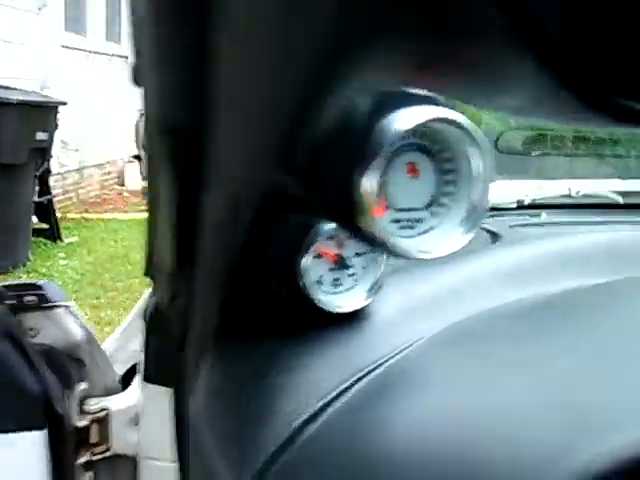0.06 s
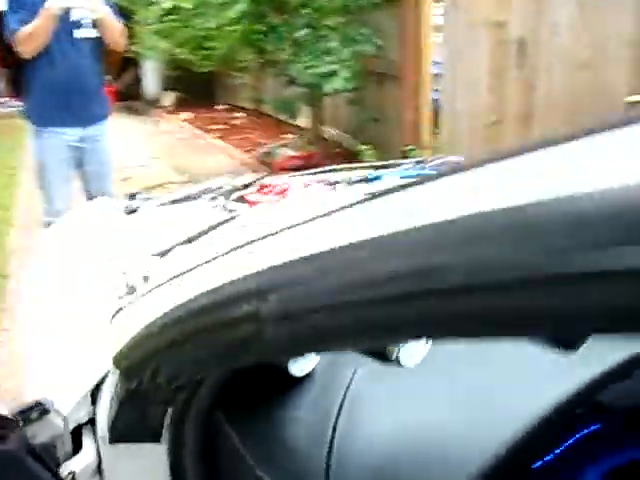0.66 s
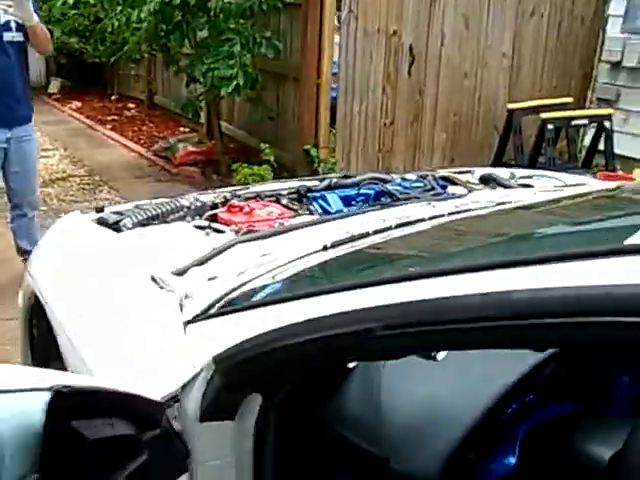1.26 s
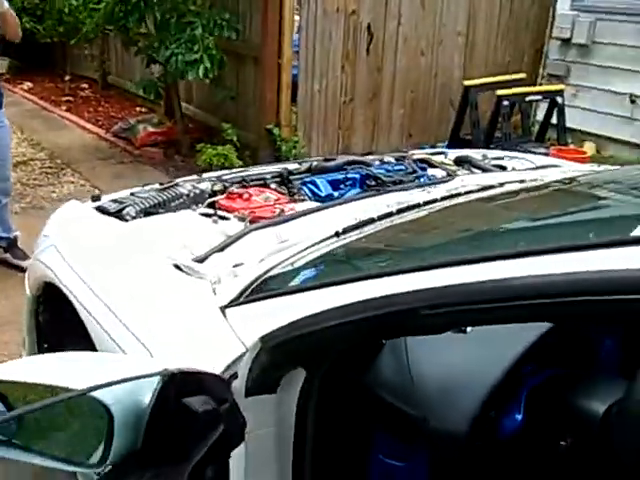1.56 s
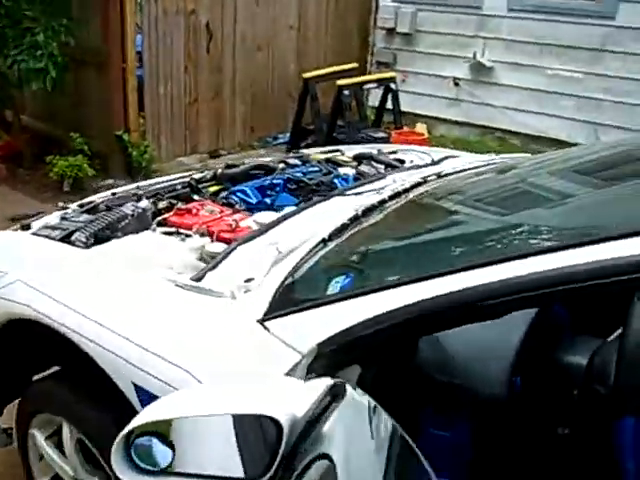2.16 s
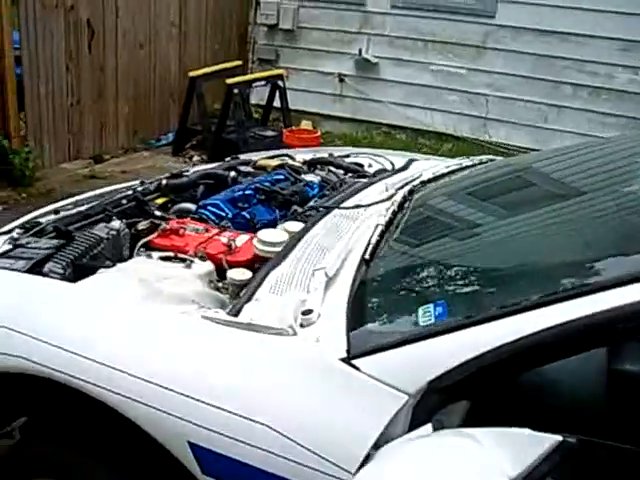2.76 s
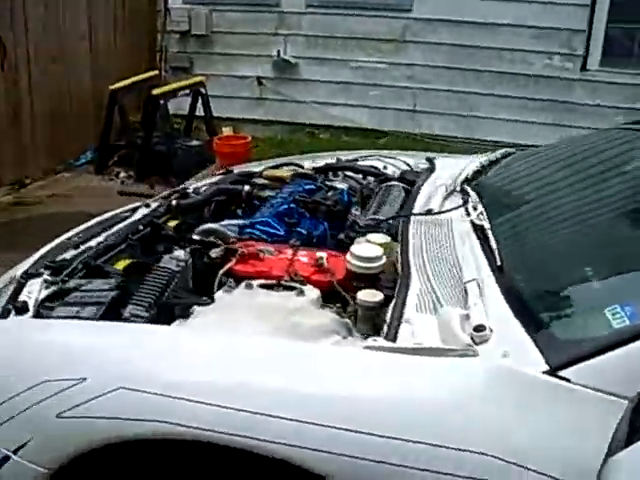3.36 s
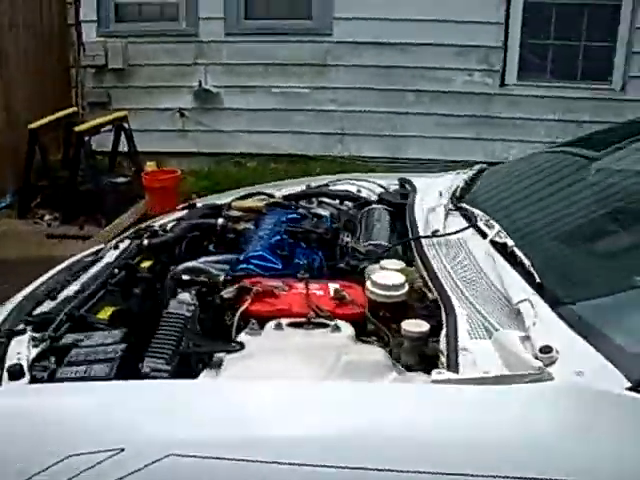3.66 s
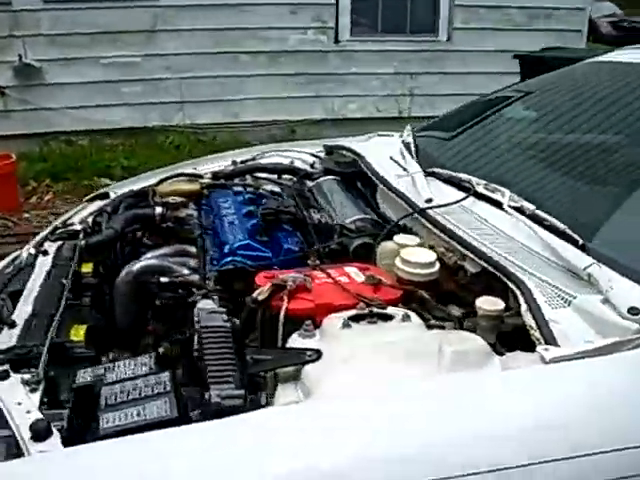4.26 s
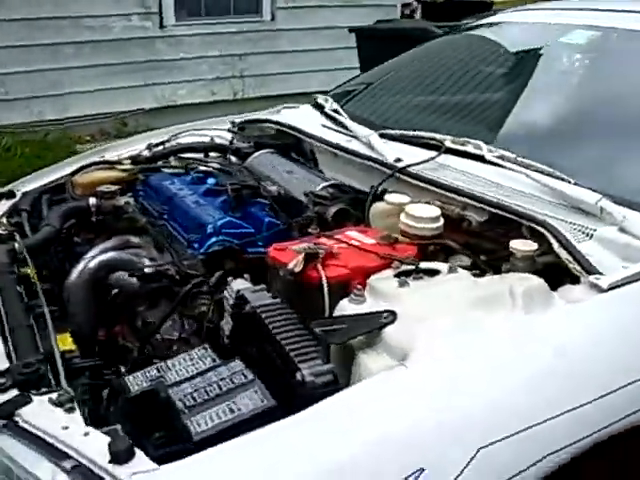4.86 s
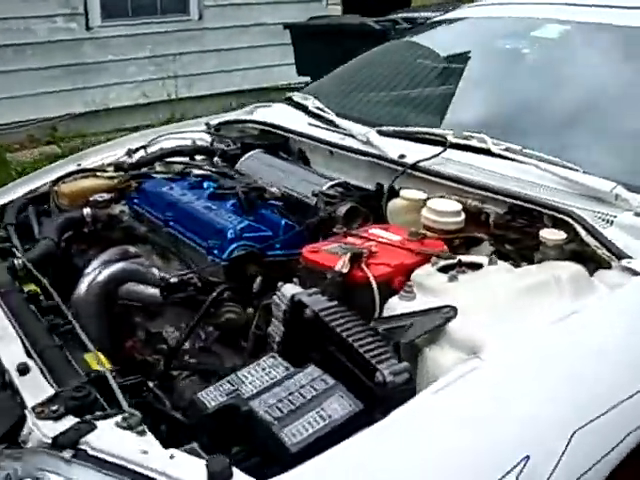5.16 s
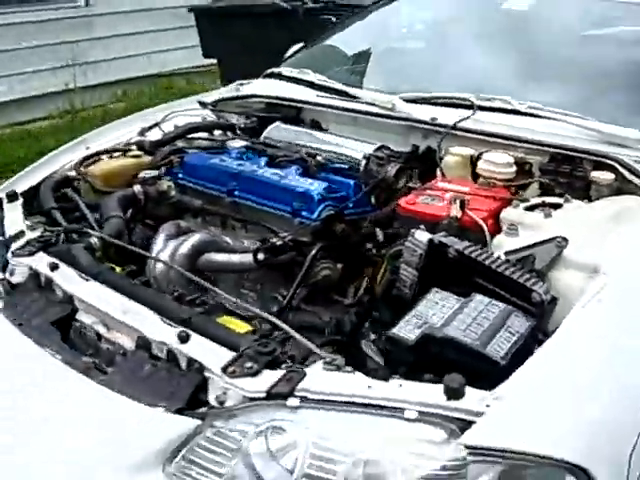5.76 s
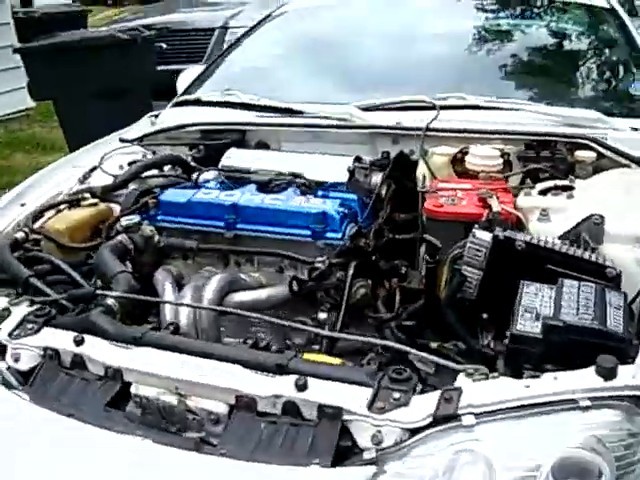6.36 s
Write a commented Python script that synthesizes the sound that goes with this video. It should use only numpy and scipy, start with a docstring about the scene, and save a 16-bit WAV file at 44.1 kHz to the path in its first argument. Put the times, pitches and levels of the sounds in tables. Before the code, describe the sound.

Outdoors, a car engine idles steadily, its exhaust pulsing in a low drone with a slight lope. A loose valve ticks evenly about seven times a second. Short puffs of wind hit the microphone early in the walk toward the open engine bay. There the rush of belts, bright hiss and fine valve clatter become closer and clearer, while a cooling fan hums softly underneath.

```python
"""The low drone of a four-cylinder car idling in a yard, heard on a walk from the driver's door to the
open engine bay. The exhaust pulses at the rear with every firing, and one weak cylinder makes it lope.
Block, belts and hiss grow louder on the approach, beside the hum of the cooling fan. One loose tappet
ticks once per camshaft turn over the clatter of the other valves. A few gusts buffet the microphone."""
import sys
import numpy as np
from scipy import signal
from scipy.fft import rfft, irfft, next_fast_len
from scipy.io import wavfile
from scipy.ndimage import uniform_filter1d, minimum_filter1d

SR = 44100
rng = np.random.default_rng(int(sys.argv[2]) if len(sys.argv) > 2 else 0)


def persist_wave(psi):
    """Save psi, clipped to +-1, as 16-bit WAV."""
    counts = np.round(np.clip(psi, -1, 1) * 32767).astype(np.int16)
    wavfile.write(sys.argv[1], SR, np.atleast_2d(counts).T)


N = 282681
TIME = np.arange(N) / SR

# The engine bay along the walk. Each row: time in seconds, rumble fader in dB, hiss fader in dB.
BAY_FADERS = [(0.0, -45.5, -60.0), (0.9, -43, -51.5), (1.8, -42, -50), (2.15, -40, -48.5),
              (2.6, -43.2, -52.5), (3.1, -38, -44), (3.8, -37.5, -44), (4.15, -35, -38.5), (4.45, -40, -41),
              (4.8, -37.5, -39), (6.41, -37, -36)]
# The ring of the valve cover. Each row: pitch in Hz, relative level in dB, seconds to fall 60 dB.
COVER_MODES = [(2270, -22, .015), (2760, -8, 0.018), (3024, -0.5, 0.028), (3203, -6.5, 0.056),
               (3490, 0.5, 0.02), (3760, -4.5, 0.03), (3900, -8, 0.032), (4130, -6.5, 0.039),
               (5170, -12, 0.032), (6270, -15, 0.014)]


def from_db(db):
    """Decibels to gain."""
    return 10 ** (np.asarray(db) / 20)


def unit_rms(x):
    """Scale to rms 1."""
    return x / np.sqrt(np.mean(x ** 2) + 1e-20)


def curve(rows, column=1):
    """One column of a timed table, drawn as straight lines through every sample."""
    columns = np.transpose(rows)
    return np.interp(TIME, columns[0], columns[column])


def drift(rate_hz):
    """A smooth random wander with a spread of 1."""
    hop, run_in = 40, 2000
    pole = np.exp(-2 * np.pi * rate_hz * hop / SR)
    white = rng.standard_normal(N // hop + run_in + 2)
    slow = signal.lfilter([1], [1, -2 * pole, pole * pole], white)[run_in:]
    return np.interp(np.arange(N) / hop, np.arange(len(slow)), unit_rms(slow))


def equalise(x, spectrum):
    """Shape a signal by rows of Hz and dB, rolling off past both ends; rms 1."""
    hz, db = np.transpose(spectrum)
    size = next_fast_len(N + SR // 10)
    log_hz = np.log(np.maximum(np.arange(size // 2 + 1) * SR / size, 1))
    beyond = np.abs(log_hz - np.clip(log_hz, np.log(hz[0]), np.log(hz[-1])))
    gain = from_db(np.interp(log_hz, np.log(hz), db) - 40 * beyond)
    return unit_rms(irfft(rfft(x, size) * gain, size)[:N])


def noise(spectrum):
    """Noise with a given spectrum; rms 1."""
    return equalise(rng.standard_normal(N), spectrum)


def wavering_tones(rows):
    """Narrow tones that wander in level and phase."""
    out = 0
    for hz, db, width_hz in rows:
        phase = 2 * np.pi * hz * TIME
        out = out + from_db(db) * (drift(width_hz) * np.cos(phase) + drift(width_hz) * np.sin(phase))
    return out


def clicks(times, sizes):
    """A train of single-sample blows."""
    at = np.round(times * SR).astype(int)
    inside = (at >= 0) & (at < N)
    return np.bincount(at[inside], sizes[inside], N)


def ring(blows, hz, t60):
    """A unit blow sets a sine of height 1 ringing."""
    pole, angle = from_db(-60 / (t60 * SR)), 2 * np.pi * hz / SR
    return signal.lfilter([0, np.sin(angle)], [1, -2 * pole * np.cos(angle), pole * pole], blows + 1e-18)


def bursts(blows, t60):
    """An envelope that jumps at each blow and dies away."""
    energy_kept = from_db(-120 / (t60 * SR))
    return np.sqrt(signal.lfilter([1], [1, -energy_kept], blows ** 2 + 1e-18))


def camshaft(first_tick_s):
    """Start times of the camshaft turns, one per two crankshaft turns, running past both ends."""
    # The idle hunts a little. Each row: time in seconds, crankshaft turns per minute.
    idle_rpm = [(0.0, 822.1), (1.0, 836.4), (1.3, 860.8), (2.3, 866.8), (2.7, 828.9), (3.1, 826.7),
                (3.95, 812.1), (5.2, 886.0), (5.8, 882.1), (6.41, 865.5)]
    seconds = np.arange(-SR, N + SR) / SR
    turns = np.cumsum(np.interp(seconds, *np.transpose(idle_rpm))) / (2 * 60 * SR)
    turns = turns - np.interp(first_tick_s, seconds, turns)
    return np.interp(np.arange(np.ceil(turns[0]), turns[-1]), turns, seconds)


def firing_count(cam_starts, times):
    """The running count of firings, four to a camshaft turn."""
    return 4 * np.interp(times, cam_starts, np.arange(len(cam_starts)))


def exhaust(cam_starts, drone_db, second_db, waver_db, dispersion, burble_db):
    """Firings puff down the pipe: a drone of harmonics, a weak cylinder's lope and a little burble."""
    # The way from the tailpipe. Each row: time in seconds, distance in metres.
    distance = [(0, 3.1), (1.5, 3.82), (2.9, 3.23), (3.2, 4.3), (3.8, 5), (4.5, 5.65), (5.3, 6.26),
                (6.41, 6.9)]
    # Harmonics of the firing rate; walls and ground favour different ones at each spot, and the first
    # booms most in the cabin. Each row: time in seconds, relative level in dB.
    boom = [(0, -15.5), (1.1, -22), (1.5, -30), (2.5, -33), (3.1, -27.5), (4.1, -29), (5.5, -48),
            (6.41, -49)]
    third = [(0, -16.5), (1.3, -18), (2.55, -25.5), (2.85, -20), (4.65, -19.7), (5.45, -23), (6.41, -22)]
    fourth = [(0, -25), (2.1, -26), (3.4, -34), (4, -45), (4.8, -32.5), (6.41, -27.5)]
    fifth = [(0, -24), (2.1, -19.5), (2.85, -22), (3.3, -27.5), (4.05, -28), (5.85, -17.5), (6.41, -19)]
    sixth = [(0, -49), (.8, -38), (2.3, -26), (5.3, -27.5), (5.7, -39), (6.1, -24), (6.41, -24)]
    # Higher harmonics, and the tones a weak cylinder puts between the harmonics.
    # Each row: multiple of the firing rate, relative level in dB.
    overtones = [(7, -47.5), (8, -42), (9, -47), (10, -66), (11, -56.5)]
    lope_tones = [(2.75, -36), (3.25, -81), (3.5, -49), (4.25, -33), (4.5, -49.5), (4.75, -52),
                  (5.25, -29.5), (5.5, -54), (5.75, -41), (6.25, -29), (6.5, -33), (6.75, -37), (7.25, -43),
                  (7.75, -52), (8.25, -51)]
    # How well the lope carries to each spot. Each row: time in seconds, fader in dB.
    lope_fader = [(0, 0.5), (2.6, -18), (2.95, -0.5), (3.5, -1.5), (4.3, -8.5), (6.41, -12)]
    # The pipe's colour on chance differences between firings. Each row: frequency in Hz, gain in dB.
    burble_eq = [(45, 10), (85, -8), (115, 11), (150, -35), (185, 8), (215, -2.5), (250, -11.5), (300, -21),
                 (400, -15)]
    travel_s = curve(distance) / 343   # sound covers 343 metres a second
    firing = firing_count(cam_starts, TIME - travel_s)

    def partial(multiple, db, cycles):
        """One tone; the pipe holds the higher ones back, so each puff trails a short ring."""
        lag = dispersion * (multiple - 3) * (multiple - 5)
        level = np.sqrt(2) * from_db(db + waver_db * drift(6.1))
        return level * np.cos(2 * np.pi * multiple * cycles - lag)

    levels_db = [curve(boom), second_db, curve(third), curve(fourth), curve(fifth), curve(sixth)]
    drone = sum(partial(multiple, db + drone_db, firing) for multiple, db in enumerate(levels_db, 1))
    drone = drone + sum(partial(multiple, db, firing) for multiple, db in overtones)
    lope = sum(partial(multiple, db, firing + 1) for multiple, db in lope_tones)
    puff_times = np.interp(np.arange(firing[-1]), firing, TIME)
    unevenness = np.tanh(rng.standard_normal(len(puff_times))) * (puff_times > 0)
    burble = equalise(clicks(puff_times, unevenness), burble_eq)
    return drone - from_db(curve(lope_fader)) * lope + from_db(burble_db) * burble


def valves(cam_starts, scatter_db, t60, cover_db, grit_db):
    """Every valve seats with a bright, gritty, quickly dying chatter and a faint ring of the cover."""
    # Valves seating. Each row: share of the camshaft turn, relative level in dB.
    seatings = [(0, 1), (.065, 2), (.245, -0.5), (.3, -2.5), (.51, -9.5), (.59, -13), (.765, -3.5),
                (.84, -10.5), (.94, -7.5)]
    # The chatter's colour. Each row: frequency in Hz, gain in dB.
    chatter_eq = [(1200, -31), (2400, -7.5), (3500, -0.5), (4300, 5.5), (5200, -3), (7400, -5), (8800, 0.5),
                  (10600, 3.5), (11600, -2), (12800, -8.5), (15700, -13)]
    times = np.concatenate([cam_starts[:-1] + share * np.diff(cam_starts) for share, _ in seatings])
    blow_db = np.repeat([db for _, db in seatings], len(cam_starts) - 1)
    blow_db = blow_db + rng.normal(0, scatter_db, len(times))
    blows = clicks(times + rng.normal(0, 0.00023, len(times)), from_db(blow_db))
    chatter = bursts(blows, t60) * from_db(grit_db * drift(310)) * rng.standard_normal(N)
    cover = sum(from_db(db) * ring(chatter, hz, decay) for hz, db, decay in COVER_MODES)
    return equalise(chatter, chatter_eq) + from_db(cover_db) * unit_rms(cover)


def engine_bay(cam_starts, block_db, belts_db, hiss_db, valves_db, throb_db, grain_db):
    """Block and belts throb with each firing under hiss and clatter; all grow as the bay comes near."""
    # The colours of block rumble, belt rush and hiss. Each row: frequency in Hz, gain in dB.
    block_eq = [(150, 3.5), (260, -3), (340, -1.5), (460, -2), (545, 3.5), (640, 1.2), (790, -1),
                (1040, -1), (1300, -5), (1900, -16)]
    belts_eq = [(700, -3.5), (1300, 0), (1600, 0), (2100, 1), (2600, -2.5), (3400, -5), (4200, -7),
                (4600, -10.5), (7000, -13)]
    hiss_eq = [(3000, -22), (4600, -29), (5600, -8.5), (7300, -2.5), (8600, -0.5), (9500, 2.5), (10300, 5),
               (11100, 2), (12000, -6), (13300, -11), (15700, -16)]
    # Whining pulleys and ringing brackets in the rumble, and faint whistles in the hiss.
    # Each row: pitch in Hz, relative level in dB, width in Hz.
    whines = [(571.3, -10.5, 5.6), (529, -14.5, 13), (757, -21, 6.4), (906, -14.5, 21), (1030, -15.5, 12),
              (1156, -17, 10), (1917, -18.5, 32), (2186, -24, 14)]
    whistles = [(3187, -22, 11), (10200, -17, 35)]
    rumble_gain, hiss_gain = from_db(curve(BAY_FADERS)), from_db(curve(BAY_FADERS, column=2))
    belts_gain = rumble_gain * (hiss_gain / rumble_gain) ** 0.3   # follows the rumble more than the hiss
    throb = throb_db * np.cos(2 * np.pi * (firing_count(cam_starts, TIME) - 0.5))
    block = from_db(block_db + throb + grain_db * drift(74)) * noise(block_eq) + wavering_tones(whines)
    belts = from_db(belts_db + throb + grain_db * drift(120)) * noise(belts_eq)
    hiss = from_db(hiss_db) * noise(hiss_eq) + wavering_tones(whistles)
    clatter = from_db(valves_db) * valves(cam_starts, scatter_db=1, t60=0.054, cover_db=-5.5, grit_db=0.5)
    return rumble_gain * block + belts_gain * belts + hiss_gain * (hiss + clatter)


def cooling_fan(hum_hz, waver_hz):
    """The electric fan hums at its own speed; a thin whistle flutters high above it."""
    # Hum and whistle each carry best to certain spots. Each row: time in seconds, fader in dB.
    hum_fader = [(0, -58), (1.6, -47.5), (2.7, -56.5), (3.4, -46), (5.3, -47), (6.41, -55)]
    whistle_fader = [(0, -67), (3.6, -66), (4.3, -55), (5.4, -54), (5.9, -42), (6.41, -45)]
    # The whistle and its faint partner. Each row: pitch in Hz, relative level in dB, width in Hz.
    whistle_tones = [(4180, -0.5, 38), (5065, -11, 24)]
    cycles = np.cumsum(hum_hz + waver_hz * drift(2.4)) / SR
    hum = from_db(curve(hum_fader)) * np.sqrt(2) * np.sin(2 * np.pi * cycles)
    return hum + from_db(curve(whistle_fader)) * wavering_tones(whistle_tones)


def wind(gust_db):
    """A light breeze, and short lumps of turbulence at the microphone port."""
    # The breeze, calmer in front of the house. Each row: time in seconds, level in dB.
    breeze_fader = [(0, -25), (1.2, -31.5), (2.2, -29.5), (3.0, -43), (6.2, -54), (6.41, -16)]
    # Gusts on the microphone. Each row: time in seconds, relative peak in dB, length in seconds.
    gusts = [(1.407, -25, 0.024), (1.476, -16.5, 0.018), (1.56, -18, 0.013), (1.979, -19.5, 0.017),
             (2.024, -23, 0.013), (2.226, -15, 0.015), (2.312, -26, 0.027), (2.361, -15.5, 0.02),
             (2.472, -25, 0.021), (2.51, -16.5, 0.017), (2.786, -17.5, 0.012), (3.32, -29, 0.021),
             (6.079, -39, 0.015)]
    # The colours of gusts and breeze. Each row: frequency in Hz, gain in dB.
    gust_eq = [(20, 10), (60, 4), (150, 7.5), (260, 0), (380, -5), (520, -15), (900, -26.5), (2000, -48)]
    breeze_eq = [(15, -1), (40, -4), (120, -4), (260, -12), (500, -32)]
    swell = sum(from_db(db) * np.exp(-2 * ((TIME - at - length / 4) / length) ** 2)
                for at, db, length in gusts)
    buffeting = from_db(gust_db) * swell * noise(gust_eq)
    return buffeting + from_db(curve(breeze_fader)) * noise(breeze_eq)


def loose_tappet(cam_starts, tick_db, uneven_db, rebound_s, rebound_db, scatter_db, rattle_db, rattle_t60):
    """Once per camshaft turn the tappet strikes, rebounds a moment later and rattles the valve cover."""
    # How the tick stands out of the hiss along the walk. Each row: time in seconds, relative lift in dB.
    tick_lift = [(0, 5), (.7, 22.5), (1.6, 23), (2.5, 13), (3.0, 16.5), (4.5, 14.5), (5.55, 19), (6.41, 5)]
    fader_db = curve(BAY_FADERS, column=2) + curve(tick_lift)
    count = len(cam_starts)
    strike_db = np.interp(cam_starts, TIME, fader_db) + rng.normal(0, uneven_db, count)
    rebound_times = cam_starts + rebound_s + rng.normal(0, 0.0021, count)
    out = 0
    for k, (hz, mode_db, t60) in enumerate(COVER_MODES):
        scatter = rng.normal(0, scatter_db, (count, 2))
        strikes = clicks(cam_starts, from_db(strike_db + scatter[:, 0]))
        rebounds = clicks(rebound_times, from_db(strike_db + rebound_db + scatter[:, 1]))
        blows = strikes + rebounds
        rattle = from_db(rattle_db) * bursts(blows, rattle_t60) * rng.standard_normal(N)
        polarity = (-1) ** k   # neighbouring modes swing opposite ways
        out = out + from_db(mode_db + tick_db) * ring(polarity * blows + rattle, hz, t60)
    return out


def scene():
    """Exhaust, engine bay and wind at one microphone; one camshaft keeps the engine's parts in step."""
    cam_starts = camshaft(first_tick_s=0.131)
    rear = exhaust(cam_starts, drone_db=1.46, second_db=-30, waver_db=0.58, dispersion=0.25,
                   burble_db=-32)
    tick = loose_tappet(cam_starts, tick_db=-8.5, uneven_db=0.2, rebound_s=0.0095, rebound_db=-5,
                        scatter_db=1.5, rattle_db=-26, rattle_t60=0.075)
    front = engine_bay(cam_starts, block_db=2.26, belts_db=1.0, hiss_db=-0.5, valves_db=0.7,
                       throb_db=0.67, grain_db=1.2)
    fan = cooling_fan(hum_hz=380.5, waver_hz=0.634)
    return (rear + tick + front + fan + wind(gust_db=0.5))[None]


def limiter(x, ceiling_db, release_db_per_s):
    """The gain ducks just ahead of any peak above the ceiling and then recovers."""
    over_db = np.maximum(20 * np.log10(np.abs(x[0]) + 1e-9) - ceiling_db, 0)
    release_db = release_db_per_s * TIME
    duck_db = np.maximum.accumulate(over_db + release_db) - release_db
    gain_db = uniform_filter1d(minimum_filter1d(-duck_db, size=89), size=89)   # eases in over 2 ms
    return x * from_db(gain_db)


def record(dry):
    """The microphone port takes out a narrow band, peaks are limited and the top is cut."""
    notched = signal.lfilter(*signal.iirnotch(8000, Q=22, fs=SR), dry)
    through_port = notched + 0.12 * (dry - notched)
    limited = limiter(through_port, ceiling_db=-7.5, release_db_per_s=80)
    high_cut = signal.ellip(12, 0.1, 80, 15720, fs=SR, output="sos")
    return signal.sosfilt(high_cut, limited)


dry = scene()
out = record(dry)
persist_wave(out)
```